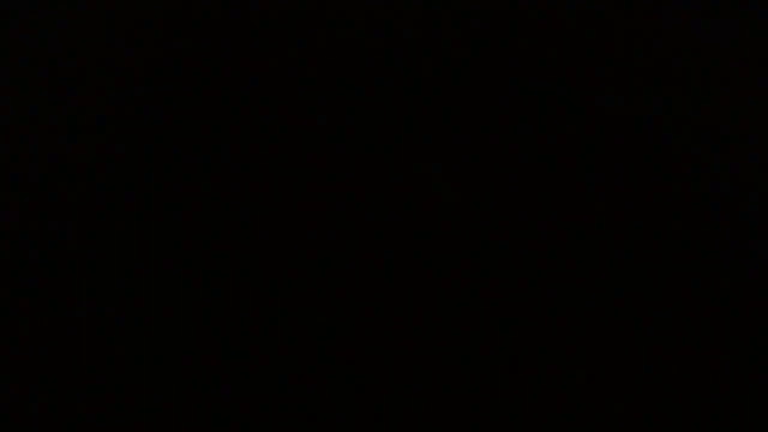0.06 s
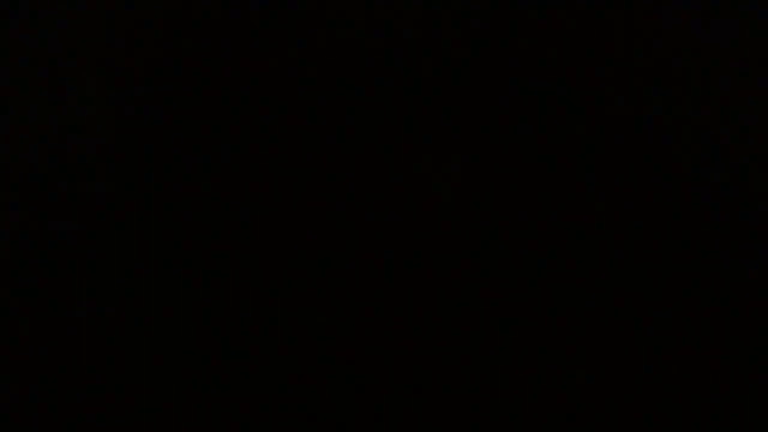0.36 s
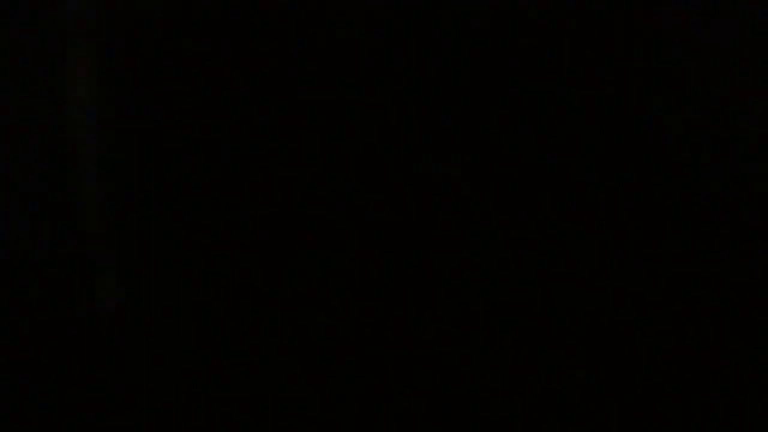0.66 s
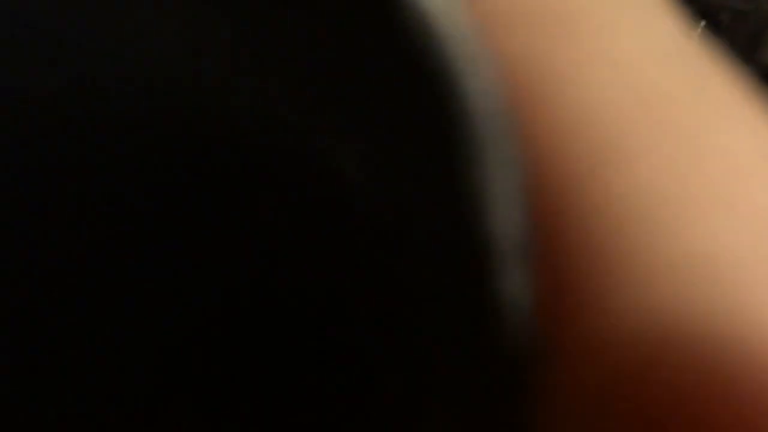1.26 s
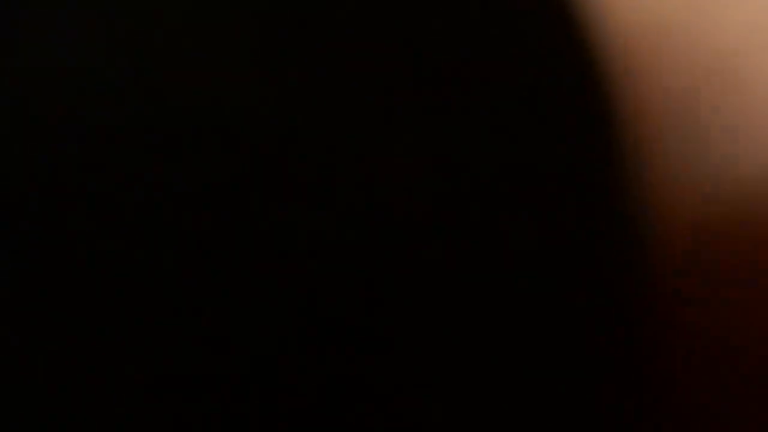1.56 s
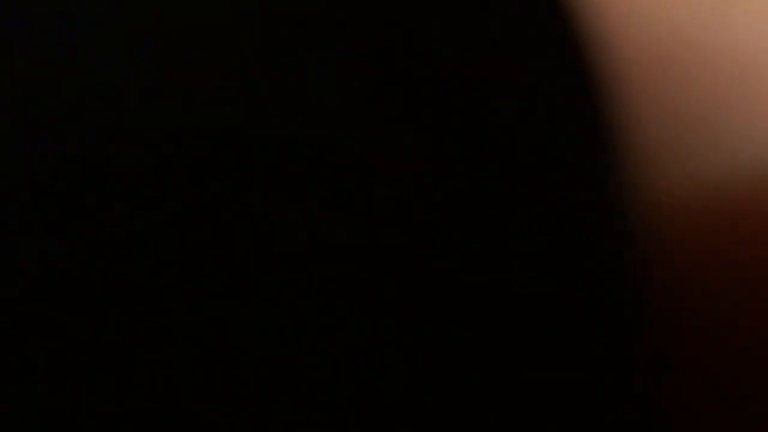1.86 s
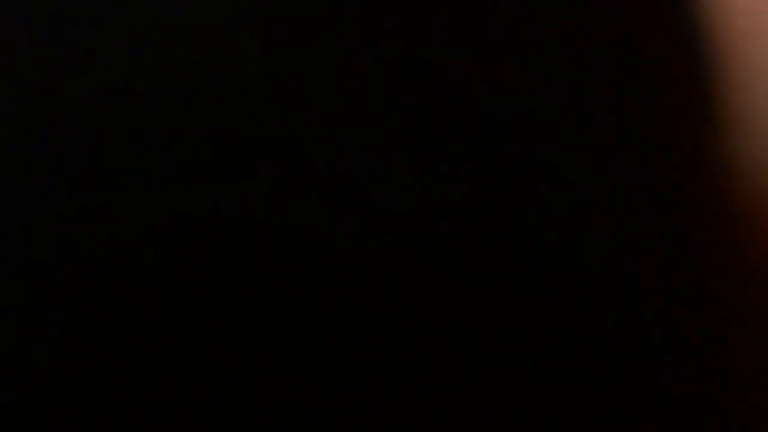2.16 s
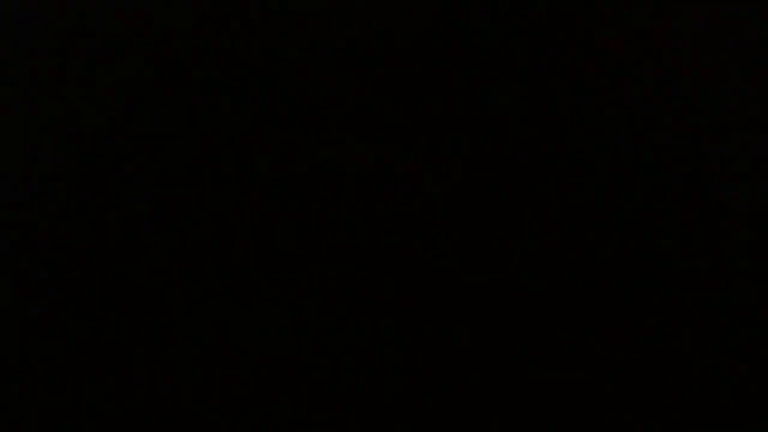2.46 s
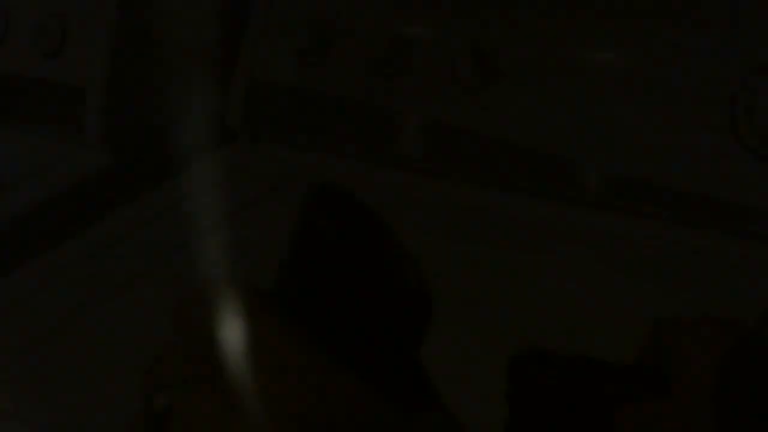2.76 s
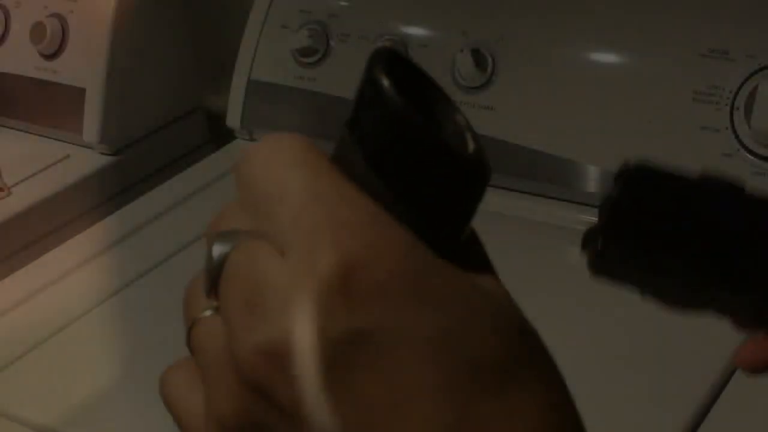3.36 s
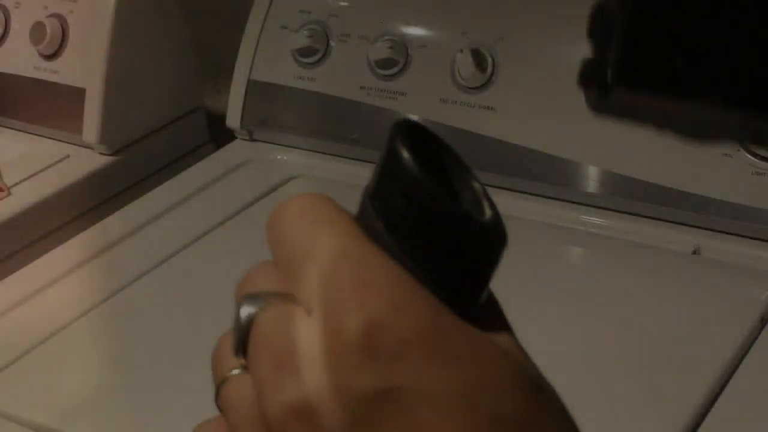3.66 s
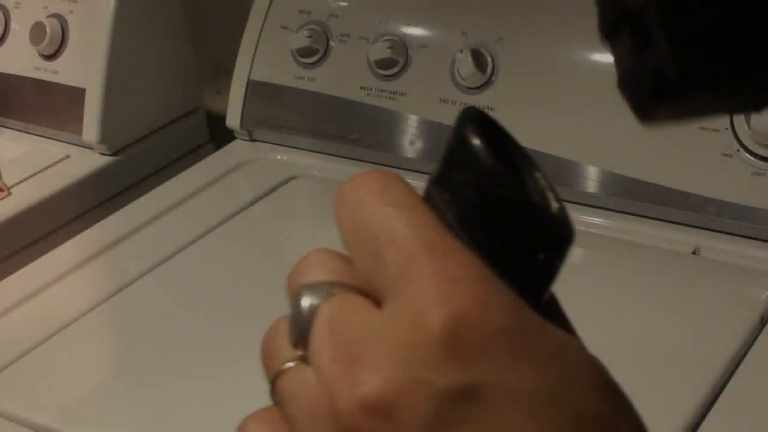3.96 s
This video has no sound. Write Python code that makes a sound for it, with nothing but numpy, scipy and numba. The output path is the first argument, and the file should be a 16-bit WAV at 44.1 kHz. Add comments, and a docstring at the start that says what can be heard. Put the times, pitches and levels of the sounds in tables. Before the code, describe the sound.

A vacuum cleaner runs in a small room, its open hose moving close to the microphone. The airy hiss turns to a hollow roar with a gliding, breathy whistle, returns briefly, then gives way again as the motor hum grows.

```python
"""In a small room a vacuum cleaner runs while the open end of its hose is moved about close by.
Turbulent air hisses over the rim and excites the resonances of the nozzle. With the mouth close and
half covered, the hiss gives way to a hollow roar and the gliding resonance of the gap. The motor
hums throughout, loudest at the end; the sound cuts out once for an instant."""
import sys
import numpy as np
from scipy import signal
from scipy.fft import rfft, irfft
from scipy.io import wavfile
from numba import njit

SR = 44100
rng = np.random.default_rng(int(sys.argv[2]) if len(sys.argv) > 2 else 0)


def master(y):
    """Save y as 16-bit WAV."""
    cut = np.clip(np.atleast_2d(y).T, -1, 1)
    pcm = np.round(cut * 32767)  # scale
    wavfile.write(sys.argv[1], SR, pcm.astype(np.int16))


N = 176400


def undb(db):
    """Amplitude ratio of a level in decibels."""
    return 10 ** (np.asarray(db) / 20)


def unit(x):
    """Normalisation to rms 1."""
    return x / np.sqrt(np.mean(x ** 2))


def curve(table, column=1):
    """Linear interpolation of one column of a time table at every sample."""
    rows = np.array(table, float)
    return np.interp(np.arange(N) / SR, rows[:, 0], rows[:, column])


def shape(x, spectrum):
    """Spectral weighting by points (f/Hz, gain/dB) joined on a log-frequency axis."""
    hz, db = np.array(spectrum, float).T
    f = np.maximum(np.arange(N // 2 + 1) * SR / N, 1)
    gain = undb(np.interp(np.log(f), np.log(hz), db))
    return irfft(rfft(x) * gain, N)


def drift(corner_hz):
    """Random fluctuation: low-passed noise of rms 1."""
    f = np.arange(N // 2 + 1) * SR / N
    return unit(irfft(rfft(rng.standard_normal(N)) / (1 + (f / corner_hz) ** 2), N))


def turbulence():
    """Turbulence as fluttering broadband noise, largely coherent between the two channels."""
    # stereo width: f/Hz, level/dB of side against mid
    side_spectrum = [(60, -23), (350, -12.5), (620, -14.5), (1200, -12), (2000, -11.5), (4000, -12.5),
                     (11000, -14)]
    mid, side = rng.standard_normal((2, N))
    side = shape(side, side_spectrum)
    flutter_db = 0.58 * drift(corner_hz=26)
    return np.array([mid + side, mid - side]) * undb(flutter_db)


def flow_noise(spectrum):
    """Source and filter: turbulence coloured by a spectrum, at rms 1."""
    return unit(shape(turbulence(), spectrum))


@njit
def bandpass(x, hz, width):
    """A damped resonator (state-variable filter) whose centre and bandwidth may move."""
    y, band, low = np.empty(len(x)), 0., 0.
    for i in range(len(x)):
        g, damping = np.tan(np.pi * hz[i] / SR), width[i] / hz[i]
        v = (band + g * (x[i] - low)) / (1 + g * (g + damping))
        band, low = 2 * v - band, low + 2 * g * v
        y[i] = damping * v
    return y


def resonance(hz, width):
    """Forced resonance: turbulence drives two like resonators in series, at rms 1."""
    hz, width = hz * np.ones(N), width * np.ones(N)
    response = np.array([bandpass(bandpass(channel, hz, width), hz, width) for channel in turbulence()])
    return unit(response / np.sqrt(width))  # same power at any bandwidth


def modes(table):
    """Superposition of fixed resonances driven by the air."""
    return sum(undb(db) * resonance(hz, width) for hz, width, db in table)


def nozzle():
    """Edge noise hisses at the rim; the nozzle resonates with it and hollows it between the peaks."""
    # hiss at the rim: t/s, relative level/dB
    hiss_levels = [(0, -21), (.2, -22), (.6, -20.5), (.89, -21.5), (1, -27.5), (1.07, -31.5), (1.26, -38.5),
                   (1.45, -34), (1.75, -26.5), (2.1, -25.5), (2.38, -22), (2.72, -24.5), (2.84, -21.5),
                   (3.1, -28.5), (3.35, -32.5), (3.58, -40), (3.85, -36.5), (4, -42)]
    # its spectrum: f/Hz, relative level/dB
    hiss_spectrum = [(30, -42), (100, -30.5), (300, -15.5), (600, -10), (1400, -9.5), (2700, -4),
                     (3400, -1.5), (4100, -0.5), (4700, -3), (5350, 1.5), (6150, 4), (6900, 3.5), (8000, 1),
                     (10700, -0.5)]
    # ring of the nozzle: t/s, main f/Hz, main level/dB, level/dB of the other modes, main width/Hz
    ringing = [(0, 4800, -25.5, -29, 900), (.3, 4220, -22.5, -28.5, 810), (.65, 4200, -23, -28.5, 750),
               (.85, 4480, -27, -31, 900), (1, 4940, -29, -32, 800), (1.08, 4470, -36.5, -40.5, 900),
               (2.2, 4540, -36.5, -37.5, 1000), (2.38, 4430, -26, -32, 1100),
               (2.53, 4600, -26.5, -33.5, 950), (2.62, 4460, -21.5, -26, 960),
               (2.76, 4510, -21.5, -29.5, 905), (2.95, 4720, -29.5, -43, 600), (3.5, 4720, -32, -50, 520),
               (4, 4810, -40, -59, 548.5)]
    # other modes: f/Hz, width/Hz, relative level/dB
    other_modes = [(1900, 750, 0), (6190, 450, -2), (7480, 650, -2)]
    # antiresonances: f/Hz, width/Hz
    notches = [(3300, 700), (5350, 1500), (6850, 780)]
    main_db = curve(ringing, column=2)
    full_depth, full_at_db = .62, -21.5  # the notches deepen with the main resonance
    depth = full_depth * undb(np.minimum(main_db - full_at_db, 0) / 2)
    hiss = flow_noise(hiss_spectrum)
    for hz, width in notches:
        band = np.array([bandpass(channel, hz * np.ones(N), width * np.ones(N)) for channel in hiss])
        hiss = hiss - depth * band
    main = resonance(curve(ringing), curve(ringing, column=4)) * undb(main_db)
    others = modes(other_modes) * undb(curve(ringing, column=3))
    return hiss * undb(curve(hiss_levels) + 6.5) + main + others


def motor():
    """Periodic rotation of the shaft gives a wavering hum with a faint second harmonic."""
    # fundamental: t/s, f/Hz
    pitch = [(0, 376), (.8, 368.7), (1.2, 371.7), (2.05, 369), (2.3, 372.2), (2.8, 370.3), (3.1, 367.3),
             (3.75, 366.5), (4, 367)]
    # hum: t/s, level/dB
    levels = [(0, -36.5), (.8, -37.5), (.88, -51), (1.05, -30.5), (1.7, -29), (2.06, -26), (2.45, -34.5),
              (2.83, -36.5), (2.98, -38), (3.04, -31), (3.4, -24.5), (3.6, -22), (3.87, -18.5), (4, -19.5)]
    jitter, waver_db, octave_db = .0015, 0.9, -29
    hz = curve(pitch) * (1 + jitter * drift(corner_hz=9.1))
    phase = 2 * np.pi * np.cumsum(hz) / SR
    hum = unit(np.sin(phase) + undb(octave_db) * np.sin(2 * phase))
    return hum * undb(curve(levels) + waver_db * drift(corner_hz=25))


def machine_noise():
    """The machine radiates stationary broadband noise with two narrow resonances into the room."""
    # broadband part: f/Hz, relative level/dB
    spectrum = [(25, -21), (100, -20), (200, -22.5), (320, -5), (600, -0.5), (1500, -1), (2800, 1),
                (3800, -2.5), (4700, -4), (6000, -4), (8000, -6), (11000, -15.5)]
    # resonances: f/Hz, width/Hz, level/dB
    body_modes = [(544.4, 25, -51), (666, 17, -45.5)]
    return undb(-30) * flow_noise(spectrum) + modes(body_modes)


def hose_roar():
    """Turbulent pipe flow makes a hollow roar in the hose."""
    # roar: t/s, level/dB
    levels = [(0, -36.5), (.88, -35), (.94, -21), (1.01, -19.5), (1.07, -24), (1.45, -23), (1.7, -21.5),
              (2.15, -19.5), (2.3, -25), (2.45, -31.5), (2.78, -28), (2.85, -26), (2.98, -21.5),
              (3.35, -24), (3.65, -25.5), (4, -24)]
    # its spectrum: f/Hz, relative level/dB
    spectrum = [(30, -52), (100, -34), (250, -16), (450, -6.5), (750, -1), (1300, 1.5), (1720, -1),
                (2000, -6.5), (2400, -18.5), (3500, -15), (8000, -35)]
    return flow_noise(spectrum) * undb(curve(levels))


def mouth_rush():
    """Flow through a constriction, the half-open mouth, makes a harsh rush."""
    # rush: t/s, level/dB
    levels = [(0, -39), (.78, -37), (.9, -22.5), (1, -20.5), (1.07, -30.5), (1.5, -36), (1.73, -23.5),
              (1.9, -25), (2.12, -30), (2.26, -24), (2.42, -30), (2.7, -49), (2.85, -25), (3, -24),
              (3.3, -21.5), (3.52, -29), (4, -74)]
    # its spectrum: f/Hz, relative level/dB
    spectrum = [(60, -50), (500, -26), (1400, -15), (1900, 1), (2350, -0.5), (2900, 1.5), (3450, -9),
                (4800, -7.5), (6200, -5), (9000, -15.5)]
    return flow_noise(spectrum) * undb(curve(levels))


def mouth_boom():
    """Heard close, the mouth booms with low noise and the standing waves of the hose's air column."""
    # boom: t/s, level/dB
    levels = [(0, -41.5), (.92, -47), (1.02, -28), (1.5, -27), (1.8, -30), (2.15, -28), (2.32, -38),
              (2.9, -57), (3.35, -37.5), (3.7, -28), (4, -39.5)]
    # its spectrum: f/Hz, relative level/dB
    spectrum = [(30, -46), (70, -30), (125, -19), (160, -9), (205, -13.5), (270, 0.5), (400, 3), (750, 1.5),
                (1200, -5.5), (3000, -43)]
    # air column: f/Hz, width/Hz, relative level/dB
    column_modes = [(160, 44, -23.5), (447.7, 24, -10), (535, 18, -10), (1422, 35, -10.5)]
    return (flow_noise(spectrum) + modes(column_modes)) * undb(curve(levels))


def gap_whistle():
    """The gap's resonance falls as the mouth is covered and rises as it opens; the stronger, the purer."""
    # breathy whistle: t/s, f/Hz, level/dB
    glide = [(.88, 1500, -47), (.96, 1010, -30), (1.01, 860, -17.5), (1.08, 610, -44), (1.38, 760, -27),
             (1.51, 805, -22), (1.55, 1000, -21), (1.59, 1320, -18.5), (1.66, 1540, -22.5),
             (1.74, 1830, -21.5), (1.9, 1670, -26), (2.05, 1450, -25.5), (2.15, 1380, -29),
             (2.23, 1870, -24), (2.32, 3020, -27), (2.45, 3930, -36), (2.85, 1430, -40), (3, 1710, -25.5),
             (3.3, 1850, -25.5), (3.5, 1120, -30), (3.72, 840, -32.5), (3.9, 1240, -23.5), (4, 1280, -40)]
    hz, db = curve(glide), curve(glide, column=2)
    strong_db, max_widening_db = -23.5, 13.5
    widening_db = np.minimum(0.39 * (strong_db - db), max_widening_db)
    relative_width = .3 * undb(widening_db)
    return resonance(hz, relative_width * hz) * undb(db)


def handling_rumble():
    """Handling makes low-frequency noise that swells towards the end."""
    # rumble: t/s, level/dB
    levels = [(0, -65), (.3, -72), (.7, -74), (2.72, -73), (2.8, -53), (2.9, -55), (3.4, -56.5), (3.8, -49),
              (4, -48)]
    # its spectrum: f/Hz, relative level/dB
    spectrum = [(20, -19), (60, -5), (130, -6), (300, -10), (1000, -50)]
    return flow_noise(spectrum) * undb(curve(levels))


def scene():
    """Superposition of machine, gusting airflow and rumble; a level difference eases them to the right."""
    # direction: t/s, level/dB of left against right
    balance = [(0, .1), (.8, 0.2), (1.3, -.2), (1.8, 0.4), (2.25, 0.5), (2.75, -0.3), (3.3, -1.3), (4, -1)]
    airflow = nozzle() + hose_roar() + mouth_rush() + mouth_boom() + gap_whistle()
    gust_db = 0.76 * drift(corner_hz=26)
    mix = airflow * undb(gust_db) + motor() + machine_noise() + handling_rumble()
    pan_db = curve(balance)
    return mix * undb(np.array([pan_db, -pan_db]) / 2)


def record(dry):
    """Attenuation and band limiting: the level drops for an instant, and a low-pass cuts the top."""
    start_s, end_s, dip_db, cutoff_hz = 2.7932, 2.8056, -26, 10950
    t = np.arange(N) / SR
    gain = np.where((t > start_s) & (t < end_s), undb(dip_db), 1)
    lowpass = signal.ellip(12, .1, 90, cutoff_hz, fs=SR, output="sos")
    return signal.sosfilt(lowpass, dry * gain)


dry = scene()
out = record(dry)
master(out)
```